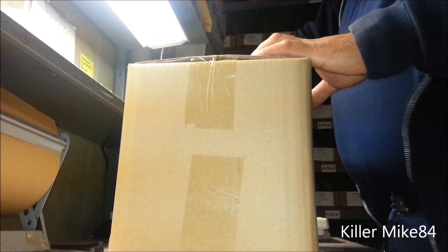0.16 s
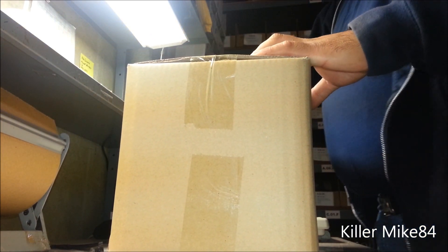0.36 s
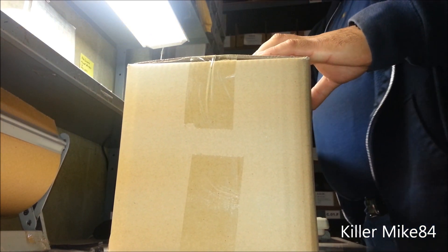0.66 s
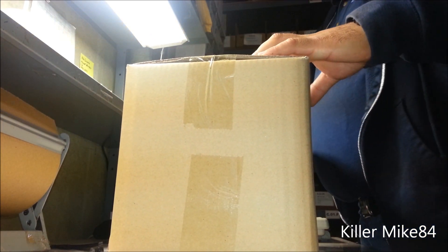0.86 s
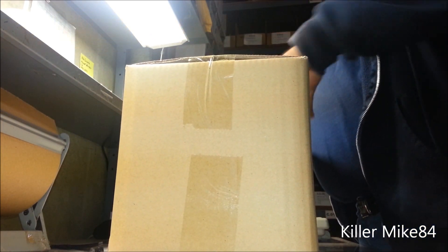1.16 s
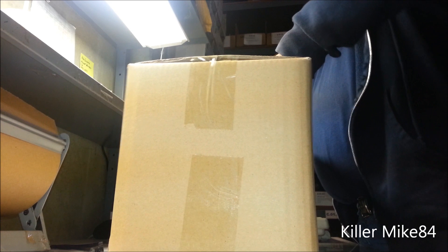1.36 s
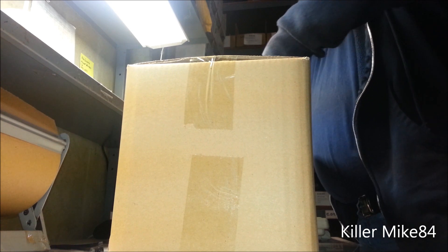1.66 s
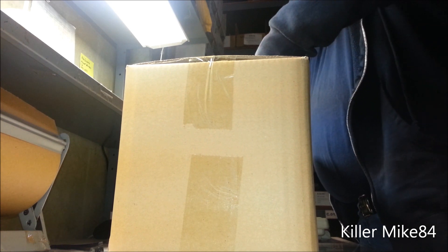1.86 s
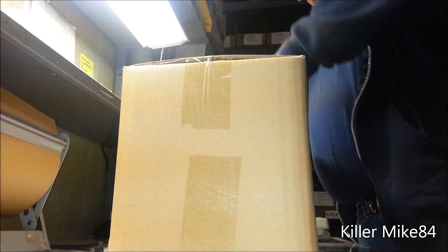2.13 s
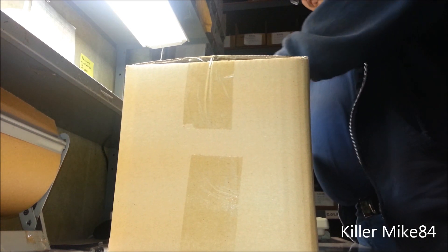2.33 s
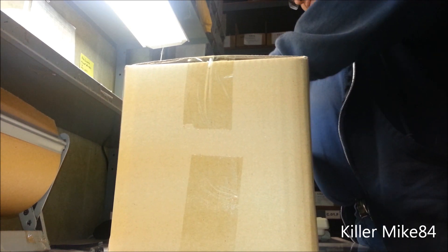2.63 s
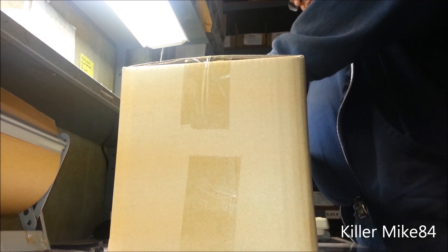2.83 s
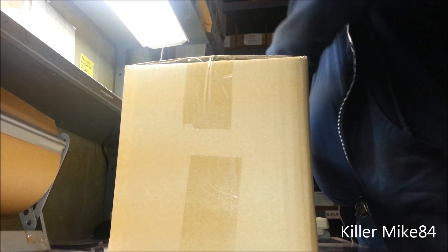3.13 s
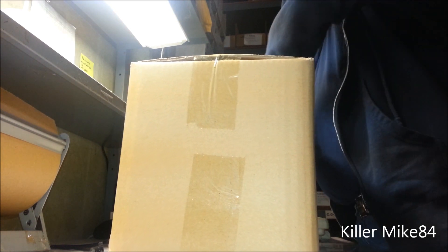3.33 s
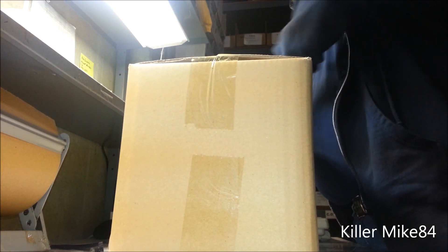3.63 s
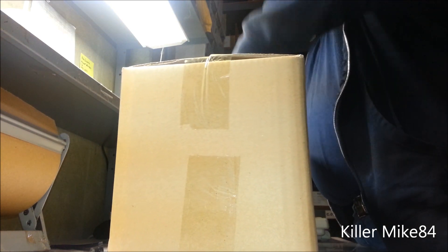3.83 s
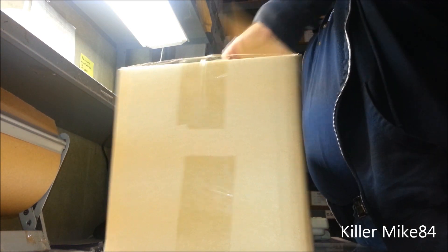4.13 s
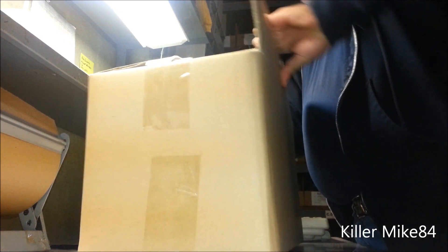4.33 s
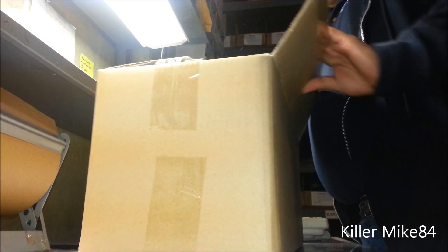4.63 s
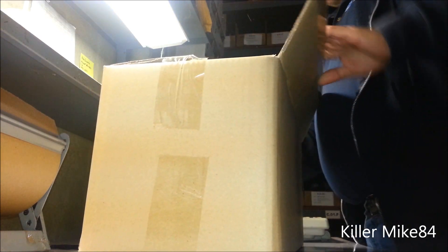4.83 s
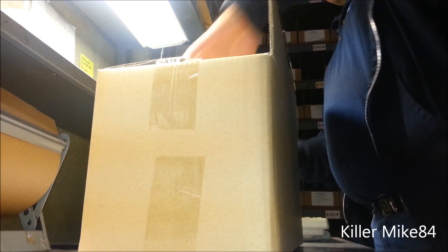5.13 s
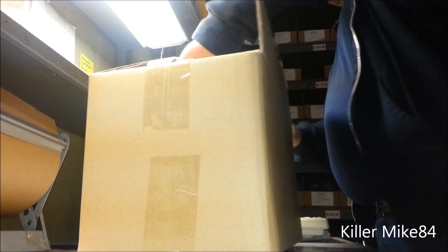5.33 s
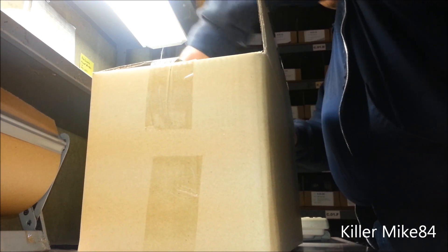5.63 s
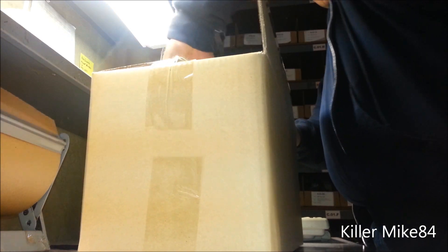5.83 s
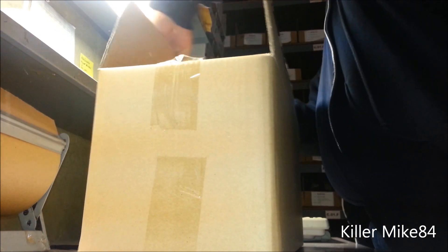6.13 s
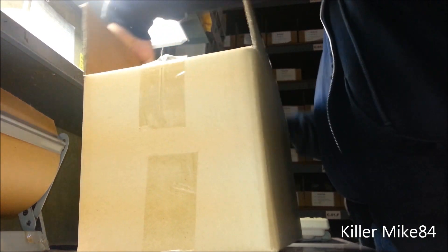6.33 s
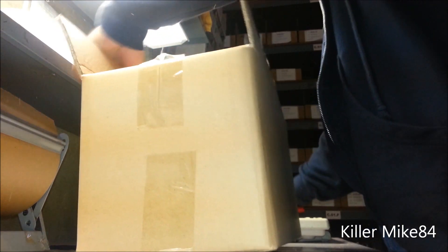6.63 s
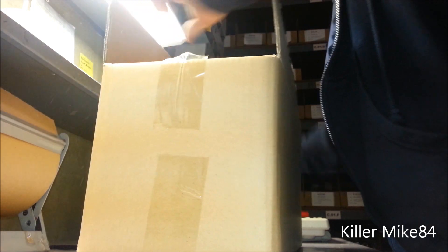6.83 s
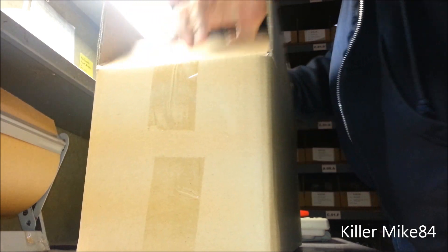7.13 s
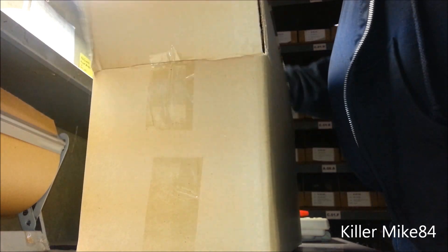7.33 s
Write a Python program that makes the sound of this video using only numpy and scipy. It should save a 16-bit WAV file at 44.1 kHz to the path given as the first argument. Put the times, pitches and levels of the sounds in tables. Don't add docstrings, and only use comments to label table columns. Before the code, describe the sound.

A hollow cardboard box is slit and opened on a bench. Slow grainy scraping comes first, with brief squeaky rasps and fine tape ticks, then near stillness. Jerks and raps grow, two booming hollow blows stand out with crackling spray, hands slide over flaps between them, and the ending is a harsh flurry of creaks, rips and snaps. Dry close stereo pickup, short dull room reflection, faint room air, distorted peaks.

```python
import sys
import numpy as np
from scipy import signal
from scipy.fft import rfft, irfft, next_fast_len
from scipy.io import wavfile
from scipy.ndimage import uniform_filter1d

SR = 44100
rng = np.random.default_rng(int(sys.argv[2]) if len(sys.argv) > 2 else 0)


def generate_wav(sig):
    pcm = np.round(np.clip(np.atleast_2d(sig).T, -1, 1) * 32767).astype(np.int16)
    wavfile.write(sys.argv[1], SR, pcm)


def convert_level_to_amplitude(level_db):
    exponent = np.asarray(level_db, float) / 20
    return 10 ** exponent


N = 329868

# frequency in Hz, bandwidth in Hz, level in dB.
BOOM = [(162, 73, -15.5), (235.3, 97, 3), (309, 180, 0.5), (425, 50.2, 2.5)]
# frequency in Hz, bandwidth in Hz, level in dB.
WALLS = [(607.6, 148, -6), (698, 119, 0), (842, 107, -4), (1030, 297, 0), (1103, 910, -10)]
# frequency in Hz, bandwidth in Hz, level in dB.
FIBRE = [(1675, 190, -1), (2242, 290, 2), (2770, 367, 3), (3133, 525, 0.5), (4110, 640, -1),
         (5030, 740, -4.5)]
# frequency in Hz, density in dB per Hz.
HISS = [(2600, -9), (4500, 0), (7200, 0.5), (10000, -3.5), (15000, -4.5)]


def unit(x):
    return x / np.sqrt(np.mean(x ** 2))


def peaked(sound, db):
    return sound * convert_level_to_amplitude(db) / np.abs(sound.mean(axis=0)).max()


def add(out, s, sound):
    i = int(s * SR)
    out[:, i:i + sound.shape[1]] += sound[:, :N - i]


def decay(t, t60):
    return np.exp(-np.log(1000) * t / t60)


def along(table, hz):
    f, v = np.transpose(table)
    return np.interp(np.log(hz + 1), np.log(f), v)


def bins(size):
    return np.arange(size // 2 + 1) * SR / size


def roomy_bins():
    return bins(2 * next_fast_len(N // 2 + 4096))


def colour(x, response):
    size = 2 * (np.shape(response)[-1] - 1)
    return irfft(rfft(x, size) * response, size)[..., :x.shape[-1]]


def rings(modes, hz, tilt_db=0.):
    gains = np.zeros(len(modes)) + tilt_db
    total = 0
    for k, (f, width, db) in enumerate(modes):
        resonance = 1j * hz * width / (f * f - hz * hz + 1j * hz * width)
        total = total + (-1) ** k * convert_level_to_amplitude(db + gains[k]) * resonance
    return total


def thin(hz):
    return (1j * hz / (140 + 1j * hz)) ** 4


def pair(size):
    # frequency in Hz, common share of the power from 0 to 1.
    likeness = [(25, 0.86), (60, 0.8), (250, 0.86), (700, 0.78), (1400, 0), (4000, 0.11), (15000, 0)]
    lag_s, lag_from_hz = 0.000386, 760
    hz = bins(size)
    share = np.clip(along(likeness, hz), 0, 1)
    common, left, right = rfft(rng.standard_normal((3, size)))
    late = common * np.exp(-2j * np.pi * np.maximum(hz - lag_from_hz, 0) * lag_s)
    together, apart = np.array([late, common]), np.array([left, right])
    return irfft(np.sqrt(share) * together + np.sqrt(1 - share) * apart, size)


def walk(rate):
    k = max(int(SR / rate), 1)
    held = np.repeat(rng.standard_normal(N // k + 1), k)
    return uniform_filter1d(held, k)[:N]


def lamps():
    # frequency in Hz, rms level in dB.
    tones = [(479.1, -69), (699.8, -75)]
    t = np.arange(N) / SR
    return sum(np.sqrt(2) * convert_level_to_amplitude(db) * np.sin(2 * np.pi * (hz * t + rng.random())) for hz, db in tones)


def room_air():
    # frequency in Hz, density in dB per Hz.
    spectrum = [(15, -53), (50, -19.5), (110, -7.5), (247, 5), (409, 1), (480, -2), (1720, -10),
                (14500, -17)]
    return unit(colour(pair(N), convert_level_to_amplitude(along(spectrum, bins(N))))) * convert_level_to_amplitude(-60)


def room(x, size=32768):
    t60_s, level_db, dull_hz = 0.13, -15.5, 5960
    t = np.arange(size) / SR
    tail = pair(size) * decay(t, t60_s) * (t > .004)
    tail = colour(tail, 1 / (1 + 1j * bins(size) / dull_hz))
    tail = tail / np.sqrt(np.sum(tail ** 2, axis=1, keepdims=True))
    return signal.fftconvolve(x, tail, axes=1)[:, :N] * convert_level_to_amplitude(level_db)


def thuds(size=16384):
    # start in seconds, peak in dB, deep peak in dB,
    # 60 dB decay time in seconds.
    slams = [(2.821, -47, -55, 0.19), (3.448, -33, -61.5, 0.27), (4.261, -26.5, -39.5, 0.25),
             (5.421, -44, -62, 0.14), (5.967, -27, -26, 0.1), (7.298, -38, -44, 0.13),
             (1.19, -55, -66, .15), (1.46, -48, -61, 0.18), (1.56, -51, -58, .2), (1.7, -50, -64, 0.16),
             (3.759, -56, -70, .2), (3.951, -44.5, -70, 0.26), (4.531, -56, -64, .15),
             (4.709, -46, -66, 0.14), (6.43, -49, -54, .12), (7.001, -46, -55, .15)]
    out, t, hz = np.zeros((2, N)), np.arange(size) / SR, bins(size)
    bench, shove = rings([(105, 68, 0)], hz) ** 2, rings([(28, 41, 0)], hz) ** 2
    for s, db, deep_db, fade in slams:
        force = pair(size) * decay(t, fade)
        add(out, s, peaked(colour(force, bench), db))
        in_phase = force[0] * np.ones((2, 1))
        add(out, s, peaked(colour(in_phase, shove), deep_db + 1.0))
    return out


def singing():
    # start in seconds, length in seconds, ring in Hz,
    # level in dB.
    strokes = [(0.01, 0.52, 270, -39), (0.899, 0.11, 2330, -34), (0.96, 0.09, 2900, -33),
               (2.69, 0.072, 2600, -38), (3.694, 0.37, 2250, -44), (4.57, 0.041, 285, -27.5),
               (5.65, .05, 272, -27), (5.693, 0.029, 900, -27), (5.398, 0.068, 970, -35.5),
               (5.728, .06, 3500, -44), (.04, .45, 2500, -42), (.7, .2, 2260, -45),
               (7.198, 0.026, 800, -11.5), (7.232, .03, 880, -10.5), (7.312, 0.014, 950, -13),
               (7.33, 0.041, 850, -17), (7.345, .03, 11500, -26), (4.92, .13, 11000, -50),
               (5.6, .16, 11000, -47), (6.22, .12, 11500, -48), (6.86, .14, 11000, -39.5),
               (2.095, .08, 3900, -38), (1.92, 0.013, 6200, -37), (5.8, .04, 3800, -37),
               (7.018, .025, 3000, -27.5), (3.74, .08, 150, -50)]
    out = np.zeros((2, N))
    for s, length, ring_hz, db in strokes:
        size = 2 * int(length * SR / 2)
        hz = bins(size)
        ring = colour(pair(size), rings([(ring_hz, 0.17 * ring_hz, 0)], hz) * thin(hz))
        rough_db = 2.5 * walk(140)[:size]
        add(out, s, unit(ring) * convert_level_to_amplitude(db + rough_db) * np.sqrt(np.hanning(size)))
    return out


def snaps(size=2048):
    # start in seconds, peak in dB, ring in Hz.
    breaks = [(.947, -28, 2800), (.984, -24, 2400), (1.018, -23, 3100), (1.0945, -20, 5000),
              (1.4243, -43, 3500), (1.578, -23, 4300), (1.6135, -31, 2500), (1.7336, -30, 7500),
              (1.752, -32, 4500), (1.8274, -38, 6000), (4.294, -22, 6300), (4.351, -25, 11000),
              (4.4948, -34, 5000), (4.5213, -41, 6500), (4.532, -42, 2800), (4.5612, -35, 8100),
              (4.636, -31.5, 4500), (4.643, -36, 4500), (4.672, -28, 9000), (5.3344, -41.5, 4000),
              (5.423, -25, 4000), (5.471, -29, 6500), (5.487, -38, 5000), (5.532, -32, 5500),
              (5.656, -41, 3500), (5.7463, -34, 3500), (5.8, -25, 4500), (2.1515, -23, 4200),
              (2.164, -25, 4000), (6.238, -32, 5000), (6.247, -28, 5000), (6.257, -27, 4000),
              (6.4213, -26, 6000), (6.4856, -25, 2496), (6.572, -36, 9000), (6.793, -20, 3500),
              (6.9, -22, 4000), (6.923, -25, 3000), (6.945, -28, 3500), (6.9895, -27, 3000),
              (7.1117, -36, 5000), (7.1307, -35, 4000), (1.4881, -20, 4450), (1.512, -25, 4500),
              (1.776, -29, 4500), (3.334, -34, 3000), (3.5386, -16, 2970), (4.4543, -20, 5750),
              (4.659, -20, 6000), (5.5049, -31, 6500), (5.7926, -34, 6900), (5.955, -29, 6000),
              (7.0335, -9, 6070), (7.2948, -4, 7820), (7.3162, -0.5, 7260), (7.3368, -4.5, 7430),
              (7.346, -2.5, 5490), (7.355, -13, 5200), (7.365, -11, 5500), (3.01, -32, 6000)]
    spray_share, spray_t60_s = .2, .018
    out, t, hz = np.zeros((2, N)), np.arange(size) / SR, bins(size)
    for s, db, ring_hz in breaks:
        force = pair(size) * (np.exp(-t / .0003) + spray_share * decay(t, spray_t60_s))
        patch = rings([(ring_hz, 0.46 * ring_hz, 0)], hz) ** 2
        add(out, s, peaked(colour(force, patch), db))
    return out


def ticks(size=4096):
    # start in seconds, peak in dB, treble share in dB.
    rips = [(1.463, -20.5, -25), (1.4878, -26, -12), (1.5595, -22.5, -24), (1.705, -28, -12),
            (1.775, -34.5, -28), (1.923, -23, -5.5), (2.5737, -44.5, -7), (2.825, -9.5, -12.5),
            (2.8766, -15.5, -4), (3.352, -29.5, -2), (3.538, -22.5, -20), (4.224, -33, 0),
            (4.2582, 2, -8.5), (5.9649, 2, -7.5), (6.2316, -37, -18.5), (6.5805, -13.5, -3),
            (6.6864, -14.5, -26), (6.7173, -6, 0), (6.7624, -5, -3), (6.8628, -6, -9), (7.186, -15, 0),
            (7.2031, -4, -23), (7.2912, -6, 2), (7.3147, -10.5, -0.5)]
    # start in seconds, peak in dB, treble share in dB.
    fibres = [(0.824, -24.5, -19), (1.048, -34, 1), (1.085, -27, 0), (1.4426, -43, -23), (1.512, -24, -5),
              (2.087, -29, -19), (2.15, -24, -12), (2.79, -29, -5), (3.3826, -12, 0.5), (3.4194, -32, -7),
              (3.436, -1, -1.5), (3.634, -25.5, -30), (4.3167, -3.5, 1), (4.4536, -27, -7), (4.66, -17, 0),
              (5.35, -29, -5), (5.505, -25, 0), (5.554, -8.5, 2), (5.609, -18.5, -7.5), (5.686, -20.5, -18),
              (5.7928, -19, 0), (5.889, -28, 4), (6.4323, -4, 0), (6.5449, -9, 3), (6.661, -22.5, -23),
              (6.837, -6.5, -0.5), (7.0229, -16, -20), (7.334, -15, 4), (7.4633, -8.5, -20)]
    # start in seconds, peak in dB, treble share in dB.
    strands = [(0.722, -21.5, 0), (.857, -35, -15), (0.879, -25.5, -25), (1.1578, -32, -1),
               (1.193, -35, -5), (1.3145, -46, -19), (1.363, -41, -23), (1.61, -42, -18),
               (1.6506, -27, -21), (1.853, -24.5, -3), (1.94, -32, -28), (2.164, -22, -15),
               (3.4498, -3.5, -21.5), (4.3316, -11, -14), (4.344, -9, -0.5), (4.382, -20, -7),
               (4.4934, -38, -14.5), (4.6015, -35.5, -18), (4.7552, -33, -6), (6.456, -16.5, 3),
               (6.7374, -21, 8), (7.033, -13.5, -12), (7.364, -20, -6)]
    out, t, hz = np.zeros((2, N)), np.arange(size) / SR, bins(size)
    hiss_response = convert_level_to_amplitude(along(HISS, hz)) * thin(hz / 4)
    # decay time of the spray in s, its share of the crack
    for events, fade, share in [(rips, 0.058, 0.81), (fibres, 0.026, 0.15), (strands, 0.019, .2)]:
        for s, db, treble_db in events:
            spot = 2.5 * rng.standard_normal(len(FIBRE))
            spray = np.exp(-t / 0.00023) + share * decay(t, fade)
            force = pair(size) * spray * (1 - np.exp(-t / 0.0002))
            rasp = colour(force, rings(FIBRE, hz, spot))
            hiss = colour(force, hiss_response)
            top = min(convert_level_to_amplitude(treble_db), .995)
            sound = np.sqrt(1 - top ** 2) * unit(rasp) + top * unit(hiss)
            add(out, s - .0005, peaked(sound, db + 0.5))
    return out


def knocks(size=8192):
    # start in seconds, peak in dB, boom share in dB,
    # loudest ring in Hz.
    presses = [(1.042, -17.5, 8.5, 1070), (1.457, -32, 0, 1280), (1.461, -11, -5, 420),
               (1.527, -25.5, -2, 278), (1.556, -15, -23, 426), (1.698, -23.5, -2, 408),
               (2.846, -21, -17, 375), (3.632, -30.5, -10, 1060), (3.758, -27, -2, 655),
               (3.873, -24.5, -20, 493), (4.261, 5.5, -9, 265.5), (4.638, -22.5, 2, 298),
               (5.349, -31.5, -1, 925), (5.412, -30, -17, 734), (5.428, -20, -34, 300),
               (5.539, -33, -26, 756), (5.889, -32.5, -15, 690), (6.729, -15.5, -9, 744),
               (6.829, -17, -30, 820), (6.865, -5.5, -43, 735), (7.198, -2.5, -47, 706),
               (7.334, -9, -11, 870)]
    # start in seconds, peak in dB, boom share in dB,
    # loudest ring in Hz.
    raps = [(.57, -32.5, 4, 446), (0.626, -24.5, -13, 413), (1.654, -25.5, 0, 377), (1.916, -26, -7.5, 915),
            (2.125, -30.5, 0, 990), (2.825, -10.5, -10, 950), (2.873, -17.5, -16, 670),
            (3.011, -32, -8, 980), (3.38, -19, -19, 606), (3.438, -6, -9.5, 415), (3.472, -13, -9, 645),
            (4.532, -31, -13, 377), (4.716, -26.5, 2, 431), (5.691, -17.5, -29, 270), (5.965, 7, -5, 266.4),
            (6.095, -18, 0, 300), (6.429, -26, -27, 1078), (6.526, -19.5, -13.5, 428), (6.581, -9, -5, 930),
            (6.762, -7.5, -6, 764), (6.865, -3, -34, 1645), (6.665, -9, -5.5, 298), (6.994, -5, 0, 322),
            (7.219, -1.5, -8, 890)]
    # start in seconds, peak in dB, loudest ring in Hz.
    creaks = [(1.363, -37.5, 610), (1.442, -22.5, 930), (1.538, -26, 810), (1.598, -26, 420),
              (1.618, -24, 354), (1.971, -35.5, 298), (4.714, -18, 697), (5.238, -46.5, 886),
              (3.452, -2, 1037), (4.347, -23.5, 234), (7.235, -3.5, 728), (7.242, 2, 906),
              (7.252, -5.5, 810), (7.262, -12, 780), (7.289, -7, 880), (7.313, -5, 1020),
              (7.352, -5.5, 856), (7.378, -10, 426), (7.408, -16, 417), (7.462, -9, 1070),
              (7.471, -8.5, 876)]
    out, t, hz = np.zeros((2, N)), np.arange(size) / SR, bins(size)
    blows = [(*b, 0.0068) for b in presses] + [(*b, 0.0044) for b in raps]
    blows += [(s, db, -17.5, ring_hz, 0.0014) for s, db, ring_hz in creaks]
    for s, db, boom_db, ring_hz, push_s in blows:
        spot = 2.5 * rng.standard_normal(len(BOOM) + len(WALLS))
        noise = pair(size)
        push = noise + 0.3 * noise.mean(axis=0) + 1.16 * np.exp(-t / 0.00032)
        force = push * (1 - np.exp(-t / 0.002)) * np.exp(-t / push_s)
        low = min(convert_level_to_amplitude(boom_db), .97)
        body = low * rings(BOOM, hz, spot[:len(BOOM)])
        body = body + 0.42 * np.sqrt(1 - low ** 2) * rings(WALLS, hz, spot[len(BOOM):])
        body = body + rings([(ring_hz, 0.13 * ring_hz, 1.5)], hz)
        soft = thin(hz) / (1 + 1j * hz / 3500)
        add(out, s - .0015, peaked(colour(force, body * soft), db + 1.0))
    return out


def layers(db, bright_db):
    return np.array([db + 0.33 - bright_db, db - 2, db - 1.3 + 0.65 * bright_db])


def contact():
    # start in seconds, length in seconds,
    # pressure in dB, brightness in dB, swell to the end in dB.
    blade = [(0, 0.44, -37, -0.5, -0.5), (0.477, 0.52, -39, -0.5, 2), (0.913, 0.13, -39.5, 5, 12),
             (1.295, 0.15, -60, -3.5, 3), (1.446, 0.31, -44.5, -3, -16), (1.832, 0.21, -54.5, 2, -13.5),
             (2.042, 0.15, -52, 3, 3), (2.635, 0.19, -57.5, -3, 7.5), (3.239, 0.11, -59.5, -2, 30),
             (3.697, 0.26, -44.5, 3.5, 4.5), (3.982, 0.094, -37.5, 4.5, 2)]
    # start in seconds, length in seconds, pressure in dB,
    # brightness in dB, swell to the end in dB.
    hands = [(4.13, 0.15, -55.5, -2, 11), (4.565, 0.57, -54, -4.5, -20), (4.93, 0.087, -48, 3.5, 8),
             (4.77, 0.15, -50.5, 4, -6), (5.103, 0.025, -53, 7, -8), (5.352, 0.3, -53.5, -0.5, -6),
             (5.543, 0.25, -46.5, -0.5, 0), (5.797, 0.22, -52, 1.5, -2), (6.118, 0.11, -41.5, 1.5, -4.5),
             (6.33, 0.072, -47.5, 0.5, -6), (6.427, .2, -43.5, -2.5, -6), (6.606, 0.091, -38.5, -7, 15),
             (6.764, .22, -32.5, 1, -1), (7.01, 0.24, -42.5, -2.5, -3), (7.223, 0.21, -25.5, 0.5, 2.5)]
    # start in seconds, pressure in dB, brightness in dB,
    # fading in dB per second.
    settling = [
        (2.2, -54, 0.5, 75),
        (2.825, -24.5, 0.5, 134),
        (3.47, -35.5, 1.5, 76),
        (4.28, -25, 1.5, 108),
        (4.33, -35, -6, 48.5),
        (5.12, -66.5, -6, 23.5),
        (5.975, -23, -2, 130),
    ]
    rise, release, jerk = 403, 186, 3001
    t = np.arange(0, N / SR + .002, .002)
    db = np.full((3, len(t)), -90.)
    for s, length, press_db, bright_db, swell_db in blade + hands:
        shape = swell_db * (np.clip((t - s) / length, 0, 1) - .5)
        shape = shape - rise * np.maximum(s - t, 0) - release * np.maximum(t - s - length, 0)
        db = np.maximum(db, layers(press_db + shape, bright_db))
    for s, press_db, bright_db, fading in settling:
        shape = np.where(t < s, jerk * (t - s), fading * (s - t))
        db = np.maximum(db, layers(press_db + shape, bright_db))
    return np.array([np.interp(np.arange(N) / SR, t, convert_level_to_amplitude(row)) for row in db])


def wandering(x, modes, hz, drift_db, shape):
    size = 2 * (len(hz) - 1)
    each = [(-1) ** k * shape * rings([mode], hz) for k, mode in enumerate(modes)]
    stirred = sum(rfft(x * convert_level_to_amplitude(drift_db * walk(9)), size) * ring for ring in each)
    return irfft(stirred, size)[:, :N] / np.sqrt(np.mean(np.abs(sum(each)) ** 2))


def rubbing():
    # start in seconds, length in seconds, pressure in dB,
    # brightness in dB, swell to the end in dB.
    scrapes = [(1.042, 0.015, -28, 3, 15), (1.078, 0.027, -38.5, 12.5, 14), (1.925, 0.043, -41, 3.5, -11),
               (2.084, 0.089, -42, 4.5, 6), (2.653, 0.071, -58, -8.5, 2), (3.187, 0.056, -58, -0.5, -3),
               (3.376, 0.036, -31, 7, -21), (3.416, 0.059, -20, 2.5, 7), (3.766, 0.052, -39, 2.5, -4.5),
               (4.249, 0.01, -22, -1, -5), (4.257, 0.021, -17.5, -4, -1), (5.387, 0.068, -43.5, -4, 4),
               (5.675, 0.041, -36, -2, 6), (6.225, .11, -35, 1, 5), (6.854, 0.096, -25.5, 1, -5),
               (7.017, 0.029, -29.5, -6.5, -7), (7.182, 0.1, -19.5, 4, -3.5), (7.326, 0.045, -30, 26.5, -1),
               (7.448, 0.063, -20.5, -0.5, 7), (4.745, 0.02, -42, 1.5, 0), (1.647, 0.018, -42.5, -1, -2),
               (1.694, 0.02, -41, -1, 0), (1.725, 0.039, -45, 3, -3), (1.768, 0.044, -45.5, 0, -1),
               (4.49, 0.01, -49, 7, 0), (5.547, 0.052, -45, 3, -2), (5.896, 0.025, -45, 3, 2),
               (7.111, 0.016, -44, 1, 0), (3.547, 0.025, -46, 1, 1)]
    slide = contact()
    power = slide ** 2
    for start, length, db, bright_db, swell_db in scrapes:
        i, j = int(start * SR), min(int((start + length) * SR), N)
        swell = np.linspace(-swell_db, swell_db, j - i) / 2
        level = convert_level_to_amplitude(layers(db, bright_db)[:, None] + swell)
        power[:, i:j] += level ** 2 * signal.windows.tukey(j - i, .22)
    press = np.sqrt(uniform_filter1d(power, size=160))
    catches = (rng.random(N) < 130 / SR) * rng.exponential(.28, N)
    press = press * (1 + signal.lfilter([1], [1, -np.exp(-1 / (0.0025 * SR))], catches))

    hz, flurry, grit = roomy_bins(), walk(60), walk(350)
    walls = pair(N) * press[0] * convert_level_to_amplitude(1.2 * flurry + 1.5 * walk(160))
    rasp = pair(N) * press[1] * convert_level_to_amplitude(1.4 * flurry + 0.85 * grit)
    hiss = pair(N) * press[2] * convert_level_to_amplitude(0.66 * flurry + 0.53 * grit)
    board = wandering(walls, BOOM + WALLS, hz, 0.9, thin(hz) / (1 + 1j * hz / 1500))
    fibres = wandering(rasp, FIBRE, hz, 1.3, thin(hz))
    fine = convert_level_to_amplitude(along(HISS, hz)) * np.abs(thin(hz / 3))
    tape = colour(hiss, fine / np.sqrt(np.mean(fine ** 2)))
    bench = unit(colour(pair(N), rings([(136.0, 65, 0)], hz) ** 2))
    bench = bench * (convert_level_to_amplitude(-71.5) + convert_level_to_amplitude(-22.5) * slide[0])
    return board + fibres + tape + bench


def scene():
    close = knocks() + ticks() + rubbing() + singing() + snaps()
    return close + room(close) + thuds() + room_air() + lamps()


def band_limit(x):
    return signal.sosfilt(signal.butter(12, 15570, fs=SR, output="sos"), x)


def record(dry):
    # frequency in Hz, left minus right in dB.
    ports = [(60, -3), (110, -5), (200, -2), (500, -8), (1290, -0.4), (2380, -0.5), (4390, -6),
             (9000, -1.5)]
    hz = roomy_bins()
    lean = along(ports, hz) / 2
    top_cut = np.clip((14650 - hz) / 250, 0, 1)
    heard = colour(dry, convert_level_to_amplitude(np.array([lean, -lean])) * top_cut)
    return band_limit(np.clip(heard, -1, 1))


dry = scene()
out = record(dry)
generate_wav(out)
```